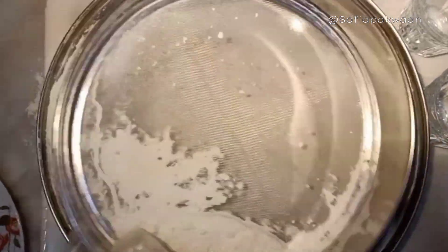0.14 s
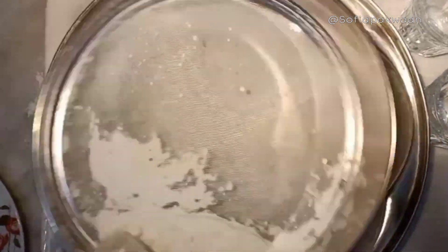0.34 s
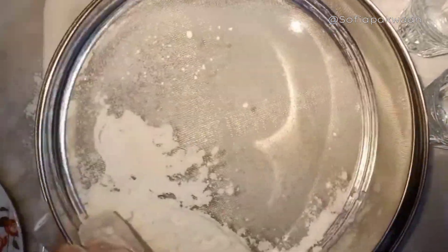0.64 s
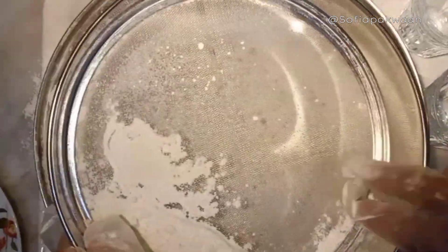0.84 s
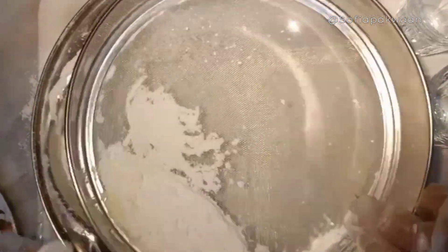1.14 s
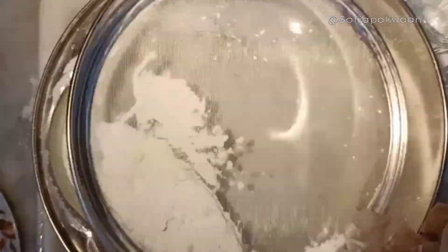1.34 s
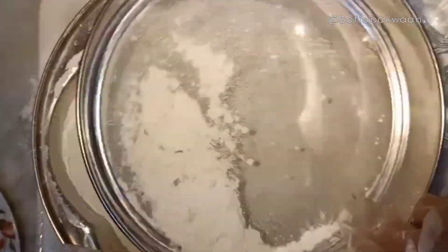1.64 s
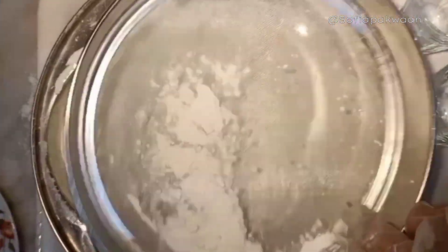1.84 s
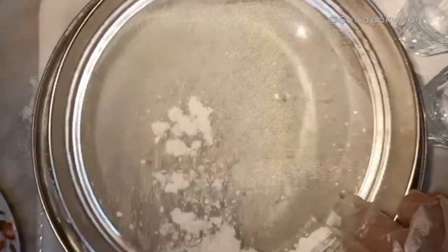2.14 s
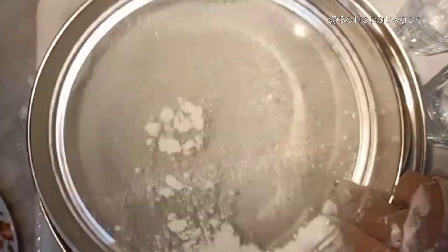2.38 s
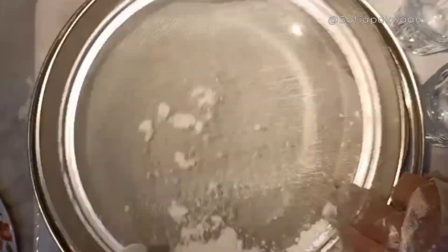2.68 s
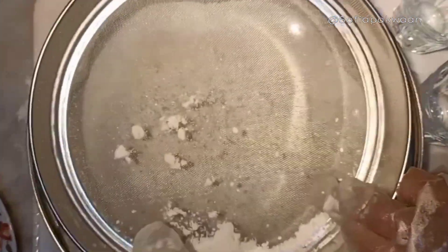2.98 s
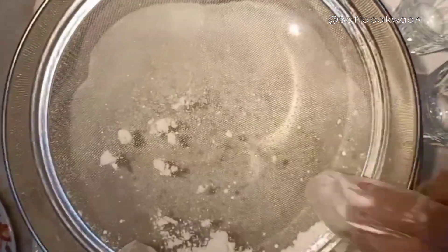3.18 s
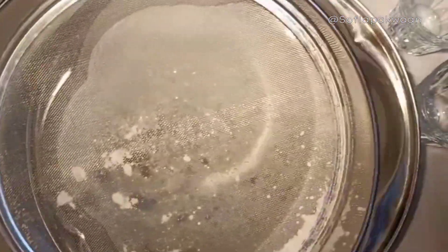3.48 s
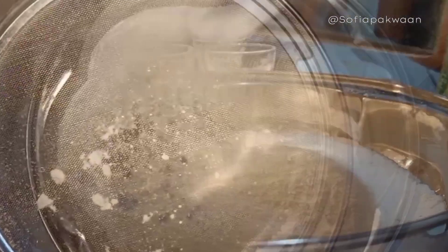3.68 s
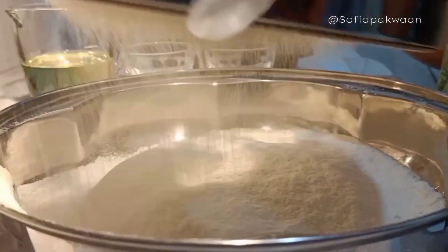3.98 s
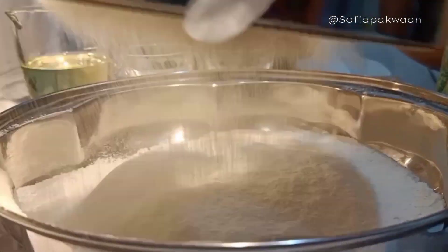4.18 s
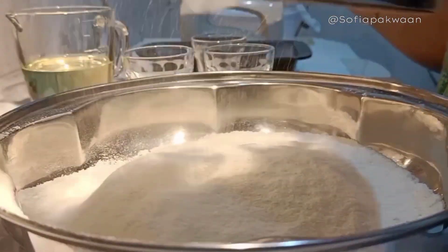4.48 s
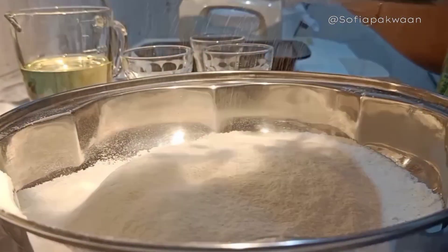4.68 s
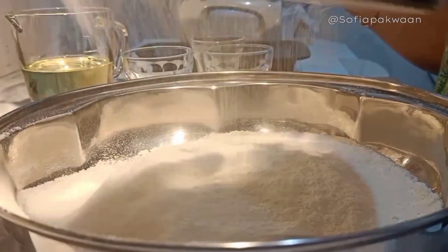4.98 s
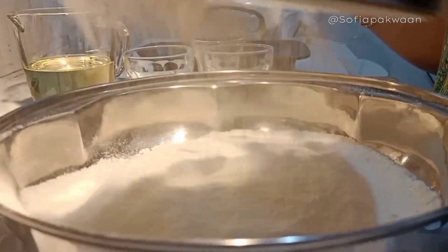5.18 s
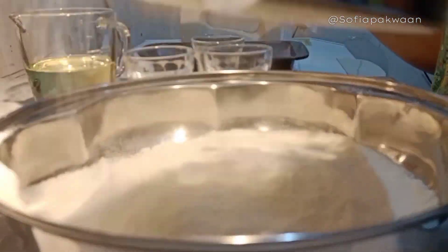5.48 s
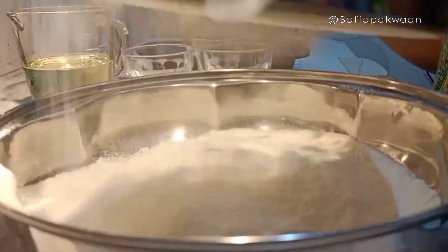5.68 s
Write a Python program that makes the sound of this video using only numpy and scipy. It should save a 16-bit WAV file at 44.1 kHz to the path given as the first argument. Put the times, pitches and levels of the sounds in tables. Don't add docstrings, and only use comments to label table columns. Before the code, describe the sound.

A steel flour sieve clangs several times on a steel bowl, flour hissing through its mesh, then soft even puffs as it is shaken higher.

```python
import sys
import numpy as np
from scipy import signal
from scipy.fft import rfft, irfft
from scipy.io import wavfile
from scipy.ndimage import uniform_filter1d

SR = 44100
rng = np.random.default_rng(int(sys.argv[2]) if len(sys.argv) > 2 else 0)


def put_to_file(sound):
    columns = np.atleast_2d(sound).T
    safe = np.clip(columns, -1, 1)
    whole_steps = np.round(safe * 32767)
    wavfile.write(sys.argv[1], SR, whole_steps.astype(np.int16))


def gain_from_db(level_db):
    decades = np.asarray(level_db, float) / 20
    return 10 ** decades


N = 257103

# start_s, peak_db, crack_db, crowd_db, crowd_length_factor, snap_db
CLANGS = [
    (0.0001, -13.5, -9.5, -9.5, 2.08, -45),
    (1.1388, -6.5, -6.5, -7.5, 1.39, -40.5),
    (1.579, -24, 4, -3, 0.75, -36),
    (1.9422, -10, 3.5, -8, 1.84, -30),
    (2.7448, -14, 5.5, -4.5, 1.59, -38),
]
# pitch_hz, level_db, t60_s
RING_1 = [(827, -37, 0.55), (1379, -40, 0.16), (1873, -25, 0.14), (1966, -24, 0.09), (2119, -41, 0.19),
          (2298, -39, 0.11), (3314, -40, 0.17), (3861, -33, 0.3), (4227, -46, 0.2)]
RING_2 = [(536, -32, 0.3), (590, -33, .1), (640, -33, 0.2), (815, -26, 0.4), (869, -38, .5),
          (934, -35, 0.4), (1033, -38, 0.37), (1157, -38, .55), (1185, -33, 0.3), (1222, -34, .15),
          (1395, -35, 0.2), (1674, -33, .15), (1718, -31, 0.33), (1863, -26.5, 0.33), (1892, -33, .58),
          (1931, -33, 0.4), (1973, -22, 0.29), (2008, -36, .55), (2046, -32, 0.25), (2310, -33, 0.35),
          (2503, -33, 0.45), (2549, -38, .58), (2587, -35, .58), (2650, -34, .5), (2689, -32, 0.22),
          (2861, -33, 0.45), (2897, -36, 0.4), (2929, -33, .2), (3150, -41, 0.55), (3209, -33, 0.4),
          (3300, -38, .55), (3385, -35, .17), (3688, -41, .4), (3815, -41, 0.5), (3851, -36, 0.55),
          (3933, -30, .2), (3967, -28, 0.18), (4002, -36, 0.55), (4079, -35, 0.3)]
RING_3 = [(533, -42, 0.22), (698, -45, 0.17), (817, -40, 0.36), (907, -48, .3), (954, -50, 0.32),
          (1388, -50, 0.28), (1666, -38, 0.28), (1982, -36, 0.24), (2078, -45, .3), (2108, -47, 0.38),
          (2271, -50, 0.5), (2358, -45, .3), (2433, -46, .3), (2931, -43, .4), (2958, -46, 0.36),
          (3808, -50, 0.29), (3935, -50, 0.5), (4069, -45, 0.19), (6648, -48, 0.3), (6696, -49, 0.34)]
RING_4 = [(549, -34, 0.14), (690, -38, .45), (816, -32, 0.62), (931, -41, .5), (1157, -41, .5),
          (1195, -34, 0.25), (1249, -37, .2), (1333, -35, 0.14), (1513, -43, .5), (1879, -41, .5),
          (1987, -27, 0.3), (2052, -29, 0.42), (2085, -35, .25), (2161, -28, 0.33), (2248, -40, .5),
          (2332, -32, 0.2), (2436, -38, .15), (2864, -39, 0.55), (2902, -41, 0.45), (2956, -31, 0.4),
          (3024, -43, 0.5), (3098, -38, .2), (3206, -39, .25), (3669, -38, 0.25), (3783, -35, 0.22),
          (3862, -46, 0.55), (4042, -44, 0.5), (4150, -32, 0.3), (4221, -41, 0.29), (6603, -46, 0.42),
          (6667, -37, 0.24)]
RING_5 = [(350, -42, .06), (460, -45, 0.12), (606, -46, 0.4), (817, -42, 0.5), (869, -43, 0.3),
          (956, -40, 0.3), (1040, -41, .2), (1136, -42, .5), (1204, -35, 0.19), (1661, -40, .5),
          (1716, -29, 0.22), (1747, -41, .55), (1865, -37, .2), (1892, -45, .5), (1997, -30, 0.2),
          (2048, -29, 0.43), (2113, -32, 0.14), (2167, -37, .15), (2199, -35, 0.18), (2283, -38, 0.42),
          (2649, -46, .5), (2719, -40, .55), (2762, -41, 0.5), (2801, -38, 0.3), (2880, -40, 0.43),
          (2958, -40, 0.45), (3085, -44, .5), (3130, -35, 0.25), (3198, -41, 0.33), (3287, -44, 0.3),
          (3324, -46, .5), (3391, -39, .22), (3494, -40, 0.25), (6683, -41, 0.24), (6741, -45, 0.37)]
# pitch_hz, density_db (per Hz)
CROWD_1 = [(150, -65.5), (250, -24), (858, -1.5), (1560, -12), (1890, -5), (2530, -11), (3940, -7.5),
           (4440, -15), (15000, -52)]
CROWD_2 = [(150, -58.5), (300, -33), (480, -12), (736, -12), (815, -10), (1590, -6), (1920, -3), (3560, -8),
           (4010, -5), (4840, -14), (6940, -11.5), (15000, -77.5)]
CROWD_3 = [(150, -38), (250, -18.5), (748, -10.5), (815, -3.5), (1130, -17.5), (2020, -1.5), (4520, -19.5),
           (6820, -33), (15000, -59)]
CROWD_4 = [(150, -36), (250, -41), (488, -12), (815, -8), (1820, -23.5), (2020, 0), (2610, -12),
           (4300, -10), (5100, -23.5), (6710, -22.5), (15000, -63.5)]
CROWD_5 = [(150, -54.5), (250, -40.5), (520, -8.5), (829, -8.5), (1510, -15.5), (1700, -5.5), (1890, -14),
           (2060, 2.5), (2530, -15.5), (2800, -5.5), (5370, -19.5), (6820, -12.5), (15000, -82.5)]
# pitch_hz, t60_s
FADE = [(250, 0.26), (600, 0.29), (1200, 0.4), (2500, 0.45), (4500, 0.35), (7000, 0.29), (10000, .06)]
# start_s, mute_db, length_s
TOUCHES = [
    (1.198, -6, .04),
    (1.4, -18, .17),
    (1.648, -12, .04),
    (2.012, -9, .06),
    (2.285, -25, .4),
]
# start_s, peak_db, ring_length_factor, edge_db, after_ring_db
KNOCKS = [
    (0.041, -10.5, 0.59, -3, -16.5),
    (0.151, -19, 0.62, -1.5, -13.5),
]
# pitch_hz, level_db, t60_s
FRAME = [(232.3, -36, 0.37), (430, -30, 0.14), (650, -23, 0.13), (722, -18.5, 0.11), (805, -18.5, 0.14),
         (927, -28.5, 0.27), (1195, -30, 0.083), (1406, -26.5, 0.22), (1500, -38.5, 0.69),
         (1716, -36, 0.12), (1960, -33, 0.25), (2180, -35, .12), (2280, -42, 0.29), (2905, -39, 0.3),
         (3255, -28, 0.12), (3930, -35, 0.098), (3800, -32.5, 0.14)]
# start_s, peak_db, ring_length_factor, edge_db, after_ring_db
REBOUNDS = [
    (1.167, -22.5, 0.82, 18, -15.5),
    (1.2289, -23.5, 0.37, -12, -4.5),
    (1.7088, -32, 0.34, 4.5, -25.5),
    (1.7177, -40, 0.21, -12, -35),
    (1.734, -34.5, 0.18, 8.5, -14),
    (1.747, -35, 0.2, -11, -26),
    (1.9731, -20.5, 0.7, -24, -12),
    (2.7513, -20.5, 0.31, 4, -32.5),
    (2.794, -32, .15, 12, -31),
]
# pitch_hz, level_db, t60_s
HELD = [(637, -28.5, 0.11), (760, -29.5, 0.049), (820, -37.5, 0.8), (907, -28, .14), (974, -31.5, 0.091),
        (1226, -39, 0.1586), (1360, -39.5, 0.31), (1548, -34.5, 0.099)]
# pitch_hz, density_db (per Hz)
THUD = [(150, -26.5), (240, 1), (420, -9), (800, -8.5), (1500, -9), (4500, -16), (9000, -49.5)]
# start_s, level_db
WAKES = [
    (1.712, -48.5),
    (1.742, -53),
]
# pitch_hz, level_db, t60_s
BOWL = [(533, -1, .15), (836, -3.5, 0.3), (760, -5.5, 0.11), (2000, -3, 0.37)]
# start_s, level_db
ROCKS = [
    (.053, -34),
    (.161, -36.5),
]
# pitch_hz, level_db, t60_s
RIM = [(932, 2, 0.099), (1464, -1, .1), (1510, -15.5, 0.49)]
# start_s, level_db
THUNKS = [
    (1.2265, -31.5),
    (1.7085, -42),
    (1.972, -24),
]
# pitch_hz, level_db, t60_s
EDGE = [(650, -3, 0.0704), (753, -1, 0.057), (884, 0, .08), (975, -3, .06)]
# start_s, peak_db, pitch_hz, click_db
TICKS = [(0.7012, -40.5, 3660, -10), (0.703, -42, 4700, -20), (0.7335, -42.5, 3780, -4),
         (0.762, -49, 6400, 1), (0.788, -49.5, 3000, -6), (0.803, -50, 3250, 4.5),
         (0.897, -38.5, 2930, -12), (0.9076, -36, 3620, -17), (0.977, -42.5, 3060, -11),
         (0.984, -39, 2420, -5), (1.0019, -34, 2620, -28), (1.0031, -45, 1290, -25), (1.05, -53, 6350, -1),
         (1.1144, -55, 5030, -4), (3.1112, -43.5, 3020, -6.5), (3.1672, -47.5, 3460, -10),
         (3.25, -41, 3350, -16), (3.251, -53, 5000, -22), (3.4064, -48, 3400, -20), (3.781, -44, 3620, -5),
         (0.8548, -39, 6440, -3), (0.8755, -42, 4750, -10), (0.9542, -46.5, 6600, -1),
         (1.0944, -51, 6680, 8.5), (3.2725, -48.5, 4700, -5), (3.2753, -47.5, 3300, -18),
         (3.272, -48.5, 800, -23), (3.3263, -63, 6400, 7), (3.359, -56.5, 5900, -14),
         (0.595, -44, 6300, -10), (3.312, -53.5, 6460, -8), (3.423, -58, 3140, -15), (1.776, -52, 2070, -8),
         (1.039, -56, 1500, -8)]
# pitch_hz,
# density_db (per Hz)
MESH = [(880, -39.5), (1500, -22), (1800, -15), (2030, -2.5), (2110, -3), (2600, -4.5), (2960, 3.5),
        (3300, -2.5), (4060, 1.5), (4560, -7), (5450, -6.5), (6400, -3), (6800, 2), (7400, -6.5),
        (8000, -28), (8860, -37.5), (9500, -38), (12400, -45), (20900, -120)]
MESH_FAR = [(880, -21), (1500, -26.5), (1900, -13), (2150, -7.5), (2420, -11), (2740, -1.5), (3710, -10),
            (4050, -3.5), (5120, -12.5), (5430, -6.5), (6930, -6), (7500, -12), (8200, -23.5), (9550, -33),
            (10700, -31.5), (14100, -33), (15400, -39)]
DUST = [(5530, -25.5), (7400, -8.5), (8000, 6.5), (8800, 5.5), (9400, 1), (9600, -8.5), (9760, -1),
        (10400, -1), (10700, -8.5), (11500, -1.5), (12400, -8), (13700, -4), (15400, -8)]
SCRAPE = [(350, -18), (500, 4), (900, 2), (1200, 1.5), (1700, -4), (2100, -31)]
# time_s, flow_db
FLOW = [(0.05, -51.5), (0.42, -52), (0.5, -53.5), (0.615, -55), (0.67, -60), (0.85, -59.5), (1.11, -57.5),
        (1.128, -70.5), (1.16, -46), (1.36, -58.5), (1.41, -48.5), (1.92, -55.5), (1.97, -44), (2.25, -53),
        (2.8, -48.5), (3.05, -62.5), (3.4, -74.5), (3.46, -77)]
# centre_s, extra_flow_db
SWINGS = [(.33, 2.5), (.41, 4), (.6, 3), (.89, 4), (.99, 2.5), (1.1, 4.5), (1.44, 0), (1.602, 8), (1.68, 5),
          (1.761, 8.5), (1.839, 7.5), (1.89, 6), (2.3, 1.5), (2.43, 6), (2.56, 1), (2.7, 0.5), (3.71, 5.5)]
# centre_s, level_db, half_length_s
DRAGS = [(.25, -66, 0.04), (.475, -78, .008), (.79, -61, 0.024), (.87, -62.5, 0.027), (.91, -61.5, 0.022),
         (1.0, -60.5, 0.031), (1.04, -64, 0.056), (1.31, -55.5, 0.071), (1.73, -55.5, 0.067),
         (2.28, -59.5, 0.027), (2.44, -65.5, 0.023), (3.02, -67.5, 0.08), (3.11, -62, .008),
         (3.27, -72, 0.037), (3.78, -71.5, 0.095)]
# centre_s, level_db, half_length_s
PUFFS = [(3.805, -59.5, 0.026), (3.9, -62.5, 0.031), (4.0, -60.5, 0.028), (4.09, -60, 0.025),
         (4.185, -59, 0.028), (4.29, -66, 0.044), (4.39, -65.5, .03), (4.51, -63.5, 0.024),
         (4.59, -68, 0.023), (4.71, -63.5, 0.027), (4.79, -64.5, 0.024), (4.89, -63, 0.029),
         (4.98, -63.5, 0.036), (5.09, -63.5, .03), (5.175, -62, 0.044), (5.29, -64.5, 0.03),
         (5.39, -63.5, 0.035), (5.5, -65, 0.021), (5.58, -61, 0.029), (5.68, -64.5, 0.033),
         (5.78, -59.5, 0.037)]
# pitch_hz, density_db (per Hz)
ROOM = [(29, -38), (50, -11.5), (68, -12.5), (81, -24), (99, -8), (119, 3), (156, -9), (303, -6),
        (334, -7.5), (500, -21), (650, -42.5), (1100, -120)]
AIR = [(260, -30.5), (450, -2.5), (842, -5.5), (1040, -6), (1360, -10), (2080, -14.5), (2320, -6),
       (3650, -7), (4300, -28), (6660, -29), (7400, -36.5), (8000, -41), (9000, -42), (11700, -38),
       (15400, -41), (15700, -94)]
# pitch_hz, width_hz, level_db
HUM = [(61.2, 3.8, 0.5), (107.8, 8.3, -8), (133, 39, 3.5), (224.8, 5.3, -6.5), (304.4, 21, -4.5)]
# centre_s, level_db, half_length_s
HUM_SWELLS = [
    (.1, -63.5, 0.16),
    (1.0, -67, 0.24),
    (1.4, -71, 0.16),
    (2.2, -72.5, 0.24),
    (3.15, -64.5, 0.19),
    (4.08, -73, 0.11),
    (5.1, -70, 0.16),
]
# start_s, level_db, t60_s
BOOMS = [
    (0.0, -43.5, 0.94),
    (.7, -61.5, 2.3),
    (1.18, -46.5, 1.34),
    (1.62, -55, 1.8),
    (1.951, -48.5, 1.6),
    (2.278, -52, 1.06),
    (2.74, -60, 12),
    (3.2, -65, 3),
    (3.7, -57, 1.15),
    (5.08, -58, 0.57),
]
STEEL_HZ = np.sort(rng.uniform(np.sqrt(300), np.sqrt(9500), 260) ** 2)

CHANGE_S = 3.775
BOWL_HZ, BOWL_BEAT_S = 817, .137


def evened(x):
    return x / np.sqrt(np.mean(x ** 2) + 1e-20)


def read(points, hz):
    f, value = np.transpose(points)
    return np.interp(np.log(hz + 1), np.log(f + 1), value)


def add(mix, s, sound):
    part = mix[round(s * SR):][:len(sound)]
    part += sound[:len(part)]


def colour(x, spectrum):
    gain = gain_from_db(read(spectrum, np.fft.rfftfreq(len(x), 1 / SR)))
    return evened(irfft(rfft(x) * gain, len(x)))


def curve(rows):
    s, *columns = np.transpose(rows)
    return [np.interp(np.arange(N) / SR, s, c) for c in columns]


def bumps(rows):
    t = np.arange(N) / SR
    return np.sqrt(sum(gain_from_db(db) ** 2 * np.exp(-((t - s) / half) ** 2) for s, db, half in rows))


def kitchen():
    t = np.arange(N) / SR
    room_db, rise_s = -65, 0.035
    power = gain_from_db(room_db) ** 2
    for s, db, t60 in BOOMS:
        since = np.maximum(t - s + rise_s, 0)
        power = power + (np.minimum(since / rise_s, 1) * gain_from_db(db - 60 * since / t60)) ** 2
    hz = np.fft.rfftfreq(N, 1 / SR)
    lines = 0
    for f, width, db in HUM[1:]:
        resonance = 1 / (1 + (2 * (hz - f) / width) ** 2)
        lines = lines + gain_from_db(db) * evened(irfft(rfft(rng.standard_normal(N)) * resonance, N))
    hum = np.sqrt(2) * bumps(HUM_SWELLS) * np.sin(2 * np.pi * 58.2 * t)
    z = signal.stft(colour(rng.standard_normal(N), ROOM), nperseg=4096, noverlap=3072)[2]
    lumps = uniform_filter1d(rng.standard_normal(z.shape), 4, 0)
    lumps = evened(uniform_filter1d(lumps, 5, 1))
    wash = evened(signal.istft(z * gain_from_db(5.4 * lumps), nperseg=4096, noverlap=3072)[1][:N])
    return hum + np.sqrt(power) * gain_from_db(-3.5) * (wash + gain_from_db(-5.0) * lines)


def distant_air():
    level_db = -69 - 3 * (np.arange(N) / SR > CHANGE_S)
    return gain_from_db(level_db) * colour(rng.standard_normal(N), AIR)


def steel(x, width_hz, depth_db):
    grid = np.arange(0, SR / 2, 4.)
    comb = (1 / (1 + (2 * (grid[:, None] - STEEL_HZ) / width_hz) ** 2)).sum(1)
    strength = rng.exponential(1, 260)[np.searchsorted(STEEL_HZ[:-1], grid)]
    gain = np.sqrt(gain_from_db(-depth_db) ** 2 + comb * strength)
    return irfft(rfft(x) * np.interp(np.fft.rfftfreq(len(x), 1 / SR), grid, gain), len(x))


def grains(per_s, spread_db):
    size = gain_from_db(spread_db * np.minimum(rng.exponential(1, N), 5))
    return size * rng.standard_normal(N) * (rng.random(N) < per_s / SR)


def sift():
    t = np.arange(N) / SR
    swing_s = 0.033
    flow_db = curve(FLOW)[0] + sum(db * np.exp(-((t - s) / swing_s) ** 2) for s, db in SWINGS)
    hard_from_s, hard_to_s, settle_s = 1.2, 3.02, .08
    settled = np.clip(np.maximum(hard_from_s - t, t - hard_to_s) / settle_s, 0, 1)
    full_flow_db = -52
    dust_db = -17 + 0.9 * np.minimum(flow_db - full_flow_db, 0) * settled
    specks = grains(14000, spread_db=-1.5)
    mesh = colour(steel(specks, width_hz=25, depth_db=0), MESH)
    dust = gain_from_db(dust_db) * colour(specks, DUST)
    scrape = colour(steel(grains(5000, spread_db=1.5), width_hz=12, depth_db=6), SCRAPE)
    gusts = evened(uniform_filter1d(uniform_filter1d(rng.standard_normal(N), 900), 900))
    flow = gain_from_db(flow_db) * (t < CHANGE_S)
    rub = np.hypot(flow * gain_from_db(-29.5), bumps(DRAGS))
    return gain_from_db(1.44 * gusts) * (flow * (mesh + dust) + rub * scrape)


def shaken_puffs():
    trickle = gain_from_db(-75) * (np.arange(N) / SR > CHANGE_S)
    hiss = steel(grains(17000, spread_db=0.5), width_hz=38, depth_db=1)
    return np.hypot(trickle, bumps(PUFFS)) * colour(hiss, MESH_FAR + [(15600, -80)])


def loose(x, patchy_db):
    z = signal.stft(x, nperseg=512, noverlap=384)[2]
    patches = uniform_filter1d(rng.standard_normal(z.shape), 6, 0)
    patches = evened(uniform_filter1d(patches, 18, 1))
    return signal.istft(z * gain_from_db(patchy_db * patches), nperseg=512, noverlap=384)[1][:N]


def tick(s, db, hz, click_db):
    t = np.arange(2 ** 11) / SR
    t60_s, reach_hz = 0.011, 4 * 630
    noise = rng.standard_normal(len(t))
    band = [(max(hz - reach_hz, 100), -60), (hz, 0), (hz + reach_hz, -60), (SR / 2, -100)]
    spark = colour(noise, MESH) + gain_from_db(-20.5) * colour(noise, DUST)
    click = gain_from_db(click_db) * spark + gain_from_db(-6.5) * colour(noise, band)
    click_decay = np.exp(-t / 0.001) + 0.27 * np.exp(-t / 0.017)
    tone = np.sin(2 * np.pi * hz * t) * gain_from_db(-60 * t / t60_s)
    return s, gain_from_db(db) * np.minimum(t / 0.00071, 1) * (tone + click * click_decay)


def ring(modes, t, stretch, bowl=1, crest_s=.003, early=0):
    hz, db, t60 = np.transpose(modes)[:, :, None]
    phase, twin_phase, split = rng.random((40, 3, 1))[:len(modes)].transpose(1, 0, 2) - .5
    scatter = .6
    twin_turn = 2 * np.pi * ((hz + 30 * split) * (t - crest_s) + scatter * twin_phase)
    turn = 2 * np.pi * (hz * (t - crest_s) + scatter * phase)
    contact = 1 + early * gain_from_db(-60 * t / (.28 * t60))
    pair = (np.cos(turn) + gain_from_db(-7) * np.cos(twin_turn)) * contact
    note = abs(hz[:, 0] - BOWL_HZ) < 12
    beat = np.cos(turn[note]) * np.sin(np.pi * t / BOWL_BEAT_S)
    pair[note] = 2 * bowl * (beat + .2 * np.sin(turn[note]))
    total = (gain_from_db(db - 60 * t / (t60 * stretch)) * pair).sum(0)
    return total / np.sqrt(np.sum(gain_from_db(db) ** 2) / 2)


def dying(crowd, t, stretch):
    noise = colour(steel(rng.standard_normal(len(t)), width_hz=7.1, depth_db=0.5), crowd)
    hz, frame_t, z = signal.stft(noise, SR, nperseg=256)
    decay = gain_from_db(-60 * frame_t / (stretch * read(FADE, hz)[:, None]))
    return signal.istft(z * decay, SR, nperseg=256)[1][:len(t)]


def wake(modes, s, db):
    t = np.arange(2 ** 14) / SR
    return s, gain_from_db(db) * np.minimum(t / 0.0076, 1) * ring(modes, t, 0.97)


def knock(modes, s, db, stretch, edge_db, after_db):
    t = np.arange(2 ** 14) / SR
    edge = colour(rng.standard_normal(len(t)), CROWD_2)
    edge = 1.2 * edge * np.minimum(t / 0.007, 1) * np.exp(-t / .005)
    body = ring(modes, t, stretch, crest_s=.0015)
    body = body + gain_from_db(edge_db) * edge + gain_from_db(after_db) * dying(THUD, t, 1.0)
    return s, gain_from_db(db - 8.5) * np.minimum(t / 0.0024, 1) * body


def clang(row, modes, crowd):
    s, db, crack_db, crowd_db, stretch, snap_db = row
    t = np.arange(2 ** 15) / SR
    crack = .6 * colour(rng.standard_normal(len(t)), crowd)
    crack = crack * (np.exp(-t / .01) + .9 * np.exp(-t / .004))
    snap = colour(rng.standard_normal(len(t)), DUST) * np.exp(-((t - .003) / .0006) ** 2)
    muted_db = 0
    for at, mute_db, length in TOUCHES:
        inside_s = np.minimum(s + t - at, at + length - s - t)
        muted_db = muted_db + mute_db * np.clip(inside_s / .015, 0, 1)
    body = ring(modes, t, 0.98, gain_from_db(muted_db), early=0.73 * gain_from_db(crack_db))
    body = body + gain_from_db(crowd_db) * dying(crowd, t, stretch) + gain_from_db(crack_db + 6.0) * crack
    rise = np.minimum(t / .0013, 1) ** 1.5
    return s, gain_from_db(db - 13.5) * rise * body + gain_from_db(db + snap_db) * snap


def scene():
    mix = kitchen() + distant_air()
    mix = mix + loose(sift() + shaken_puffs(), patchy_db=0.88)
    for row in TICKS:
        add(mix, *tick(*row))
    for modes, rows in (BOWL, WAKES), (RIM, ROCKS), (EDGE, THUNKS):
        for row in rows:
            add(mix, *wake(modes, *row))
    for modes, rows in (FRAME, KNOCKS), (HELD, REBOUNDS):
        for row in rows:
            add(mix, *knock(modes, *row))
    rings = RING_1, RING_2, RING_3, RING_4, RING_5
    crowds = CROWD_1, CROWD_2, CROWD_3, CROWD_4, CROWD_5
    for row, modes, crowd in zip(CLANGS, rings, crowds):
        add(mix, *clang(row, modes, crowd))
    return mix[None]


def roll_off(x):
    return signal.sosfilt(signal.butter(12, 16450, fs=SR, output="sos"), x)


def record(dry):
    lowpass = signal.firwin(511, 15550, window=("kaiser", 9), fs=SR)
    edged = signal.oaconvolve(dry, lowpass[None], "same", axes=1)
    ceiling = 1.2
    finished = ceiling * np.tanh(edged / ceiling)
    return roll_off(finished)


dry = scene()
out = record(dry)
put_to_file(out)
```